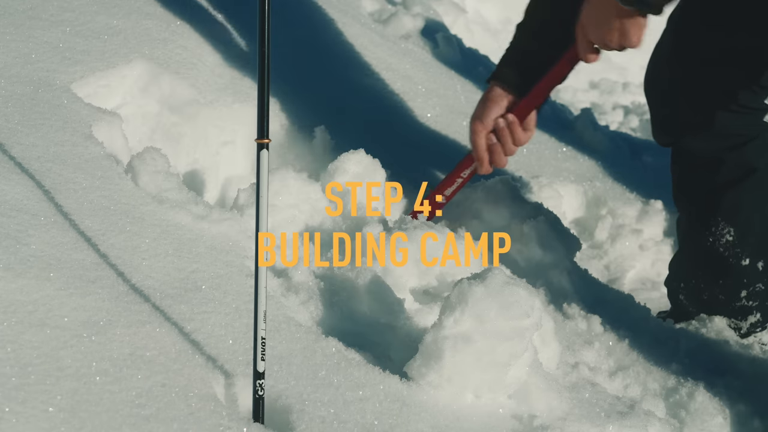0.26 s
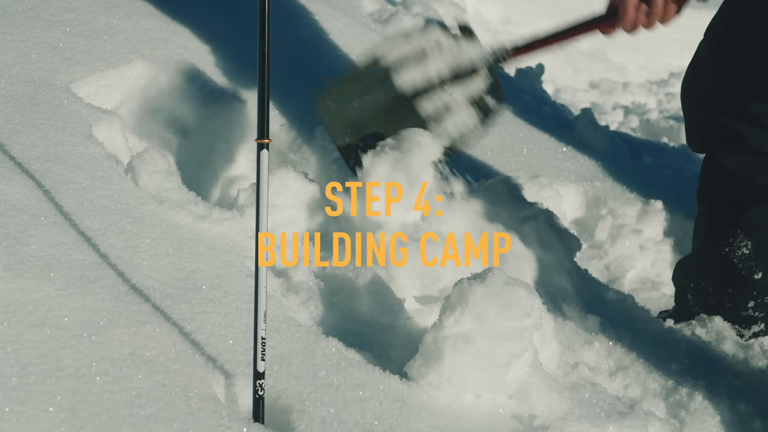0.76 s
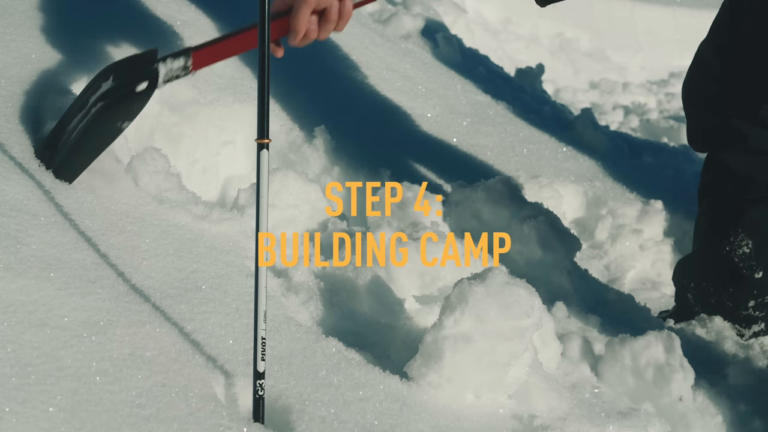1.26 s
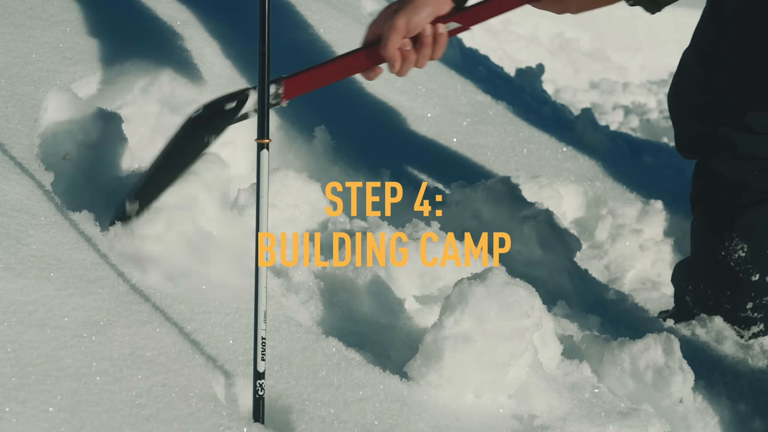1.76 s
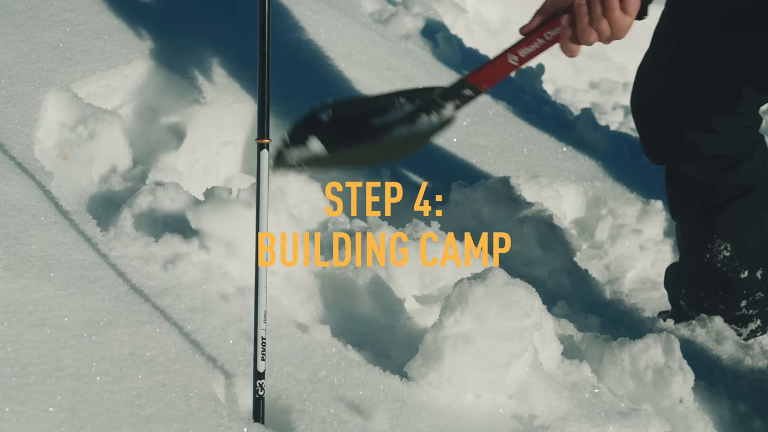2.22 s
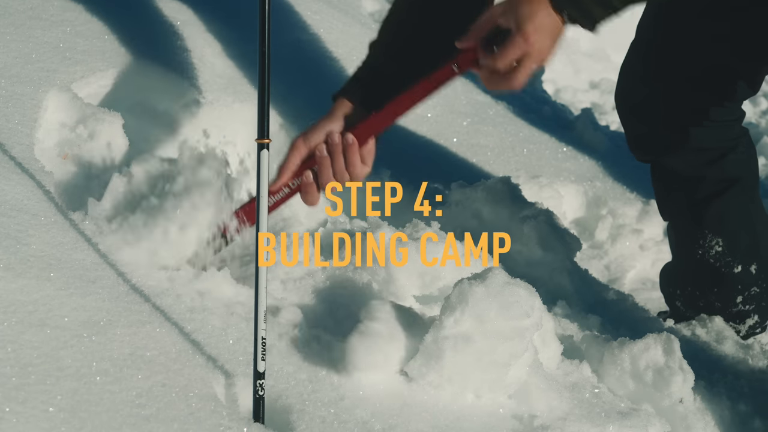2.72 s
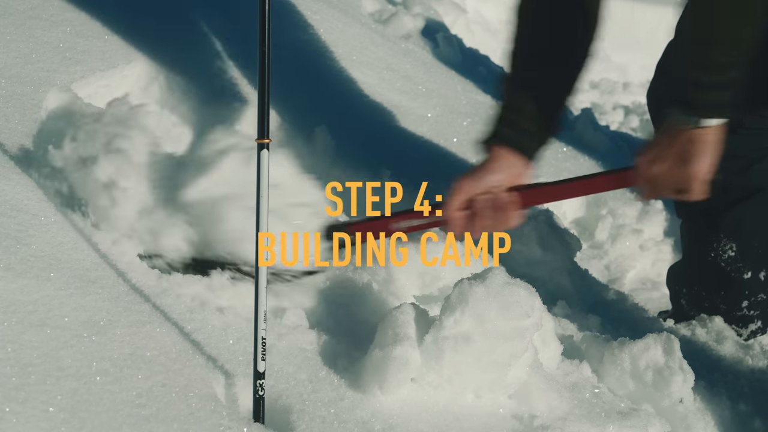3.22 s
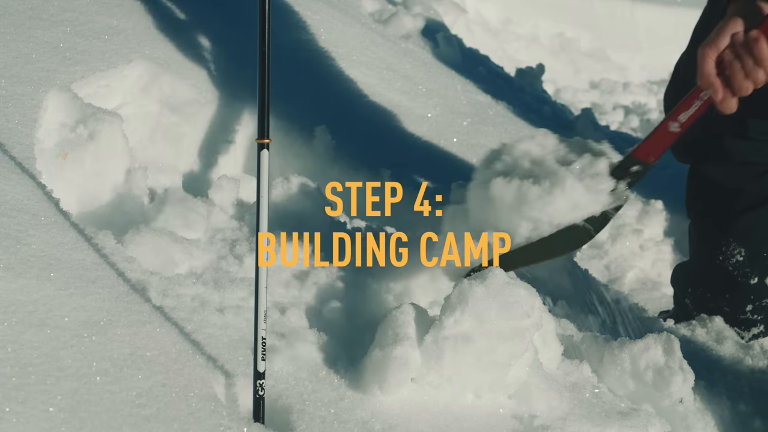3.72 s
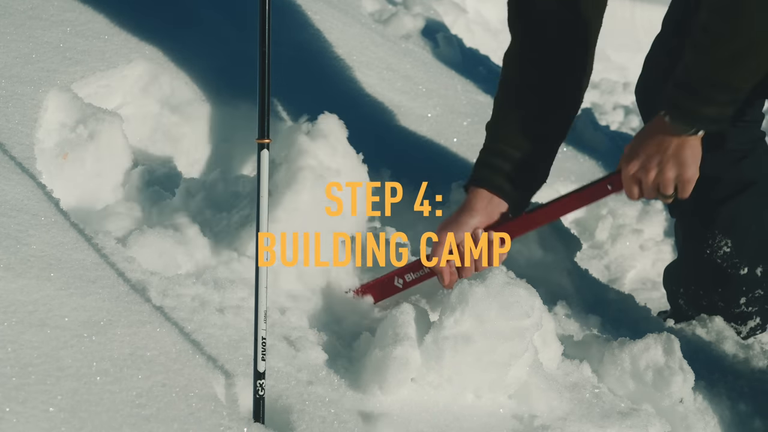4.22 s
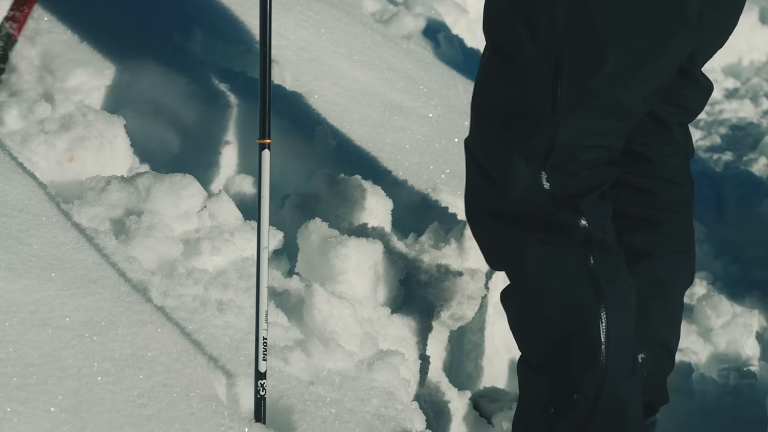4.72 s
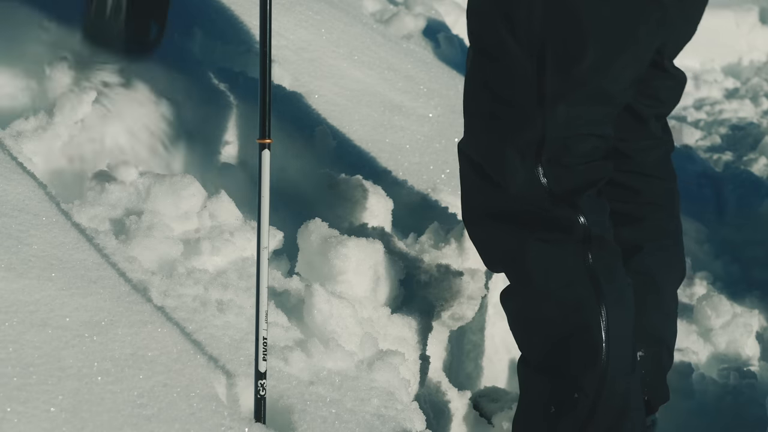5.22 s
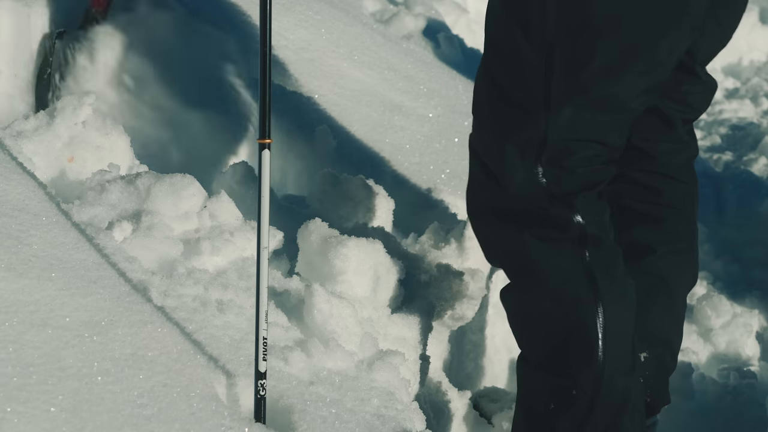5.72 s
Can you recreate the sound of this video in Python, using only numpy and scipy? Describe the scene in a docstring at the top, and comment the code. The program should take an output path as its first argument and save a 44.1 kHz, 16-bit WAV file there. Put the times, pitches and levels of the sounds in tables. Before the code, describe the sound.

One nearby microphone catches a shovel digging snow with no echo, the same in both channels. Quiet crunches lead into bright icy stabs and long scraping cuts, answered by trickling crumbs, light metallic pings and muffled lumps. Later strokes are shorter and softer, with low snowpack booms, a few scoops near five seconds and a final crisp jab. Only faint hiss and a low drone lie behind.

```python
"""Shovelling deep snow

A metal shovel digs outdoors, close to one microphone, with no echo and only faint air behind it.
Blade strokes and stabs are showers of random ice fractures, coloured and passed through blade resonances.
Crumbs tick as noise cracks with ringing modes, and lumps thud as damped sines with a puff of noise.
Low filtered noise makes the snowpack boom; steady hiss and a low drone make the air."""
import sys
import numpy as np
from scipy import signal
from scipy.fft import rfft, irfft, next_fast_len
from scipy.io import wavfile
from scipy.ndimage import uniform_filter1d, map_coordinates

SR = 44100
rng = np.random.default_rng(int(sys.argv[2]) if len(sys.argv) > 2 else 0)


def wav_record(signal):
    """Record a signal, one row per channel, as 16-bit PCM in the file named by sys.argv[1]."""
    frames = np.transpose(np.atleast_2d(signal))
    bounded = np.clip(frames, -1, 1)
    # unit amplitude maps onto the largest positive 16-bit level
    quanta = np.round(bounded * 32767).astype(np.int16)
    wavfile.write(sys.argv[1], SR, quanta)


N = 263156
TIME = np.arange(N) / SR

# modes of the bare blade: (frequency [Hz], width [Hz], level [dB])
BLADE_MODES = [(701, 36, -1), (850, 26, -8), (1243, 58, -11), (1475, 58, -3.5), (1632, 94, -2),
               (1885, 62, -5), (2127, 90, -3.5), (2418, 25, -14), (3084, 58, -11), (3420, 37, -8),
               (4370, 170, -11.5), (4950, 160, -13), (6390, 190, -8), (7220, 220, -5.5), (8290, 240, 3)]
# spectrum of snow crushed by the blade: (frequency [Hz], relative level [dB])
CRUSH_SPECTRUM = [(100, -46), (280, -22), (480, -1.5), (680, -1), (1100, 3.5), (1500, -1.5), (2300, -10.5),
                  (5000, -23.5)]
# spectrum of the yielding pack: (frequency [Hz], relative level [dB])
PACK_SPECTRUM = [(20, -15), (45, -21), (70, 1), (120, -5.5), (220, 1), (350, 1.5), (600, -4.5), (1500, -23)]
# spectrum of flying powder: (frequency [Hz], relative level [dB])
POWDER_SPECTRUM = [(2500, -40), (6000, -3.5), (8800, 3), (11000, -0.5), (14000, -2), (16000, -7.5)]


def digging():
    """Each movement drives edge, face, pack and powder; the blade's ring in dB is averaged by edge power."""
    # Movements: (start [s], rise [s], hold [s], level [dB], sag over the hold [dB],
    # extra load [dB], extra powder [dB], free ring of the blade [dB])
    # the edge slices fast through firm snow
    cuts = [(1.37, 0.077, 0.033, -47, -2.5, -5, -3, -1.5), (1.47, 0.13, 0.13, -24, 9, -3, -3, 3),
            (1.71, 0.059, 0.078, -32, 3.5, 0, -2.5, 6), (2.455, 0.078, 0.13, -23, 14.5, 5, 7, -1),
            (3.84, 0.059, 0.056, -32, -1.5, -9, 0, -20), (3.945, 0.03, 0.093, -35.5, 0, -2.5, 4.5, -7.5)]
    # the blade slides under a block and carries it
    scoops = [(.18, 0.28, 0.13, -44.5, -1, 3, -8.5, 5), (.565, 0.055, 0.036, -45, -1, 1, 2.5, 6),
              (3.07, 0.06, 0.13, -49.5, 3, 6, 4.5, -4), (3.345, 0.036, .065, -48, -5.5, -3.5, 4.5, -8),
              (4.9, 0.043, 0.083, -40.5, 3.5, -8, 1, 6), (4.98, 0.058, 0.082, -40.5, 0, -4, 0, -29),
              (5.11, 0.037, 0.049, -41.5, 6.5, -17, 3.5, -6)]
    # levering and treading squeeze the pack
    presses = [(0, 0.02, 0.176, -71, 0, 6.5, -3, -5), (.16, 0.06, 0.091, -57.5, 0, 6, -12.5, -12),
               (1.25, 0.02, 0.052, -54, -1.5, 1, 7, -2), (2.705, .025, 0.056, -46, 5, 1, -4, -6),
               (2.885, 0.033, 0.11, -53, -2.5, 4.5, -4, -30), (3.03, 0.092, 0.069, -53, -2.5, -2, 2, -8),
               (3.26, 0.027, 0.053, -58, -1.5, -6, 0, -6), (3.95, 0.061, .11, -53.5, 3, 8, 5, -9),
               (4.14, 0.057, 0.093, -61.5, 1, 5.5, 8.5, -15),
               (4.305, 0.024, 0.079, -51.5, 5.5, 0, 2.5, -11),
               (4.44, 0.031, .15, -58.5, -1.5, -0.5, 2.5, -1), (4.69, 0.088, 0.099, -50.5, -1, 3, 2.5, -10),
               (5.69, .04, 0.15, -60, 4, 2.5, 5.5, -4), (5.82, 0.095, 0.06, -52.5, 2.5, 3, 2, -9)]
    # loose snow runs off the blade
    spills = [(.65, 0.022, .11, -50.5, 1, 1, -4.5, 9), (1.89, 0.045, 0.0182, -54.5, 2, -2, -1.5, 11),
              (1.966, 0.015, 0.036, -53, 2, 0.5, -4, 6), (2.03, .03, 0.12, -65, 2, 10, -4, 9),
              (2.195, 0.05, 0.018, -50.5, 14, -3, -8, 19), (2.27, 0.033, 0.041, -57.5, 4, 0, -0.5, 3),
              (3.44, 0.024, 0.062, -51, 5.5, 3.5, -1.5, 0.5), (3.545, 0.084, 0.086, -46.5, 6, -11, -4, -8),
              (3.72, .04, 0.094, -62, 8, 14.5, -3, -10.5), (5.225, 0.0385, 0.084, -53.5, 12, -9, 5.5, -16)]
    # fine powder sifts down
    sifts = [(.095, 0.037, 0.062, -56, 0, 0, 0.0071, -13), (.78, 0.032, .4, -65.5, -3.5, 0, 0.0055, 0),
             (1.028, 0.0068, .025, -51, 10.5, 0, 0, 0), (2.29, .08, 0.093, -58.5, 8, 0, 0.029, -5),
             (5.31, 0.091, 0.087, -65, 16, 0, 0.008, -8.5)]
    # What each kind stirs up, re its level: (scraping [dB], crushing [dB], pack yielding [dB],
    # powder [dB], loaded ring before its trade with the free ring [dB], release t60 of the push [s])
    # balance of a cut
    cut_mix = (-1, -7.5, -27, -11.5, -11, 0.19)
    # balance of a scoop
    scoop_mix = (-1, 1.5, -13, -7.5, 4, 0.05)
    # balance of a press
    press_mix = (0.5, 2, -3.5, -6, -8.5, 0.32)
    # balance of a spill
    spill_mix = (0, -7, -14, -0.5, -13, 0.1554)
    # balance of a sift
    sift_mix = (-6.5, -46, -30, -1, -6.5, 0.07)
    powder_power, pack_power = 1.3, 0.84  # powder flies only at speed; the pack yields even to a slow push
    load_crush = 0.34  # share of the extra load, in dB, that also goes into crushing
    ring_trade = 0.27  # dB gained by the loaded modes for each dB that snow takes from the free ring

    power = np.zeros((4, N))
    ring = np.zeros((2, N))
    kinds = [(cuts, cut_mix), (scoops, scoop_mix), (presses, press_mix),
             (spills, spill_mix), (sifts, sift_mix)]
    for rows, mix in kinds:
        edge_db, face_db, pack_db, powder_db, loaded_db, t60 = mix
        for s, rise, hold, db, sag_db, load_db, more_powder_db, free_db in rows:
            span = slice(*np.searchsorted(TIME, [s, s + rise + hold + 2 * t60]))
            push = effort(TIME[span] - s, rise, hold, sag_db, t60)
            edge = amp(edge_db) * push
            face = amp(face_db + load_crush * load_db) * push
            weight = amp(pack_db + load_db) * push ** pack_power
            spray = amp(powder_db + more_powder_db) * push ** powder_power
            drive = amp(db) * np.array([edge, face, weight, spray])
            power[:, span] += drive ** 2
            ring[:, span] += np.outer([free_db, loaded_db - ring_trade * free_db], drive[0] ** 2)
    return np.sqrt(power), ring / (power[0] + 1e-20)


def effort(t, rise, hold, sag_db, t60):
    """A movement swells gradually, sags over its hold (climbs if negative), then dies away."""
    swell = np.clip(t / max(rise, 1e-3), 0, 1) ** 1.65  # gathers speed gradually
    held = np.clip((t - rise) / max(hold, 1e-3), 0, 1)
    release = np.maximum(t - rise - hold, 0)
    return swell * amp(-sag_db * held - 60 * release / t60)


def strokes(drive, ring_db):
    """The blade slides through snow: its edge scrapes, its face crushes, the pack yields and powder sprays."""
    # spectrum of grains under the edge: (frequency [Hz], relative level [dB])
    scrape_spectrum = [(400, -27.5), (900, -9.5), (1700, -1.5), (2600, -1.5), (4000, 1.5), (5600, -3),
                       (7200, -7.5), (9500, -14.5), (16000, -38)]
    edge, face, weight, spray = drive
    edge_snaps = fractures(rate=7000, spread_db=3.0, clump_db=0.9, clump_rate=110)
    scrape = on_blade(patchy(coloured(edge_snaps, scrape_spectrum), depth_db=1.17), *ring_db)
    face_snaps = fractures(rate=2500, spread_db=2.5, clump_db=1.0, clump_rate=130)
    crush = on_blade(patchy(coloured(face_snaps, CRUSH_SPECTRUM), depth_db=2.0), *ring_db)
    pack_snaps = fractures(rate=1200, spread_db=2, clump_db=-1.0, clump_rate=79)
    pack = coloured(pack_snaps, PACK_SPECTRUM)
    powder_snaps = fractures(rate=18000, spread_db=2.5, clump_db=-0.8, clump_rate=100)
    powder = coloured(powder_snaps, POWDER_SPECTRUM)
    judder = amp(1.15 * wobble(70))  # the blade sticks and slips
    return judder * (edge * scrape + face * crush + weight * pack + spray * powder)


def stabs():
    """A fast thrust shatters the crust in one dense, bright burst."""
    # quick stabs through the crust: (time [s], level [dB], rise [s], hold [s], t60 [s],
    # crush re level [dB], thud re level [dB], powder re level [dB])
    thrusts = [(1.21, -40, 0.0053, 0.011, .04, -20, -37, -1.5),
               (1.224, -34, 0.0041, 0.014, 0.062, -19, -26, -4),
               (1.235, -24.5, 0.0084, 0.009, 0.044, -12, -31.5, -12.5),
               (1.295, -35, .004, 0.015, 0.15, -10.5, -24, -10.5),
               (2.445, -51, .001, 0.00274, .03, -13, -23, -10),
               (2.458, -41.5, .0015, 0.0093, 0.067, -9, -23, -2),
               (2.473, -28, 0.0071, 0.0109, 0.058, -14.5, -38, -5),
               (3.872, -44, 0.0028, 0.0055, 0.055, 0, -19.5, -1),
               (3.973, -37, 0.0029, .008, 0.097, 0.5, -11, 1),
               (4.545, -30.5, .0016, 0.023, 0.11, -1.5, -8, -4.5),
               (5.133, -38, 0.0029, 0.0084, 0.054, -7, -18, -9),
               (5.608, -52, 0.0042, .012, .03, -13, -24.5, 4),
               (5.626, -23.5, 0.00088, 0.026, 0.136, -10, -23.5, -6.5),
               (5.669, -34, 0.0057, 0.041, 0.053, -5, -11, -6)]
    # spectrum of the breaking crust: (frequency [Hz], relative level [dB])
    crust_spectrum = [(400, -58), (900, -9.5), (1800, -2.5), (3200, -1.5), (4300, 3.5), (5600, -1.5),
                      (7000, -3), (9000, -14), (16000, -39)]

    def shatter():
        """Ice bonds snap in a dense shower."""
        return fractures(rate=14000, spread_db=2.2, clump_db=1.4, clump_rate=300)

    crust = on_blade(coloured(shatter(), crust_spectrum), free_db=-6, loaded_db=-5)
    powder = coloured(shatter(), POWDER_SPECTRUM)
    crush = coloured(shatter(), CRUSH_SPECTRUM)
    pack = coloured(rng.standard_normal(N), PACK_SPECTRUM)
    out = np.zeros(N)
    for s, db, rise, hold, t60, crush_db, thud_db, powder_db in thrusts:
        snow = crust + amp(crush_db) * crush + amp(thud_db) * pack + amp(powder_db) * powder
        out += amp(db) * burst(s, rise, hold, t60) * snow
    return out


def crumbs(drive, ring_db):
    """Loose crumbs trickle off the disturbed snow in small, sparse clicks."""
    spectrum = [(200, -2.5), (700, -1.5), (1500, -6.5), (4000, -6.5), (9000, -15), (16000, -24)]
    stirred = np.sqrt(np.abs(uniform_filter1d(drive[1], size=SR // 8)))  # follows the smoothed crushing
    clicks = fractures(rate=70, spread_db=2, clump_db=1, clump_rate=10)
    return amp(-35.5) * stirred * on_blade(coloured(clicks, spectrum), *ring_db)


def ticks():
    """Hard crumbs crack against the blade and ring most the modes near the contact's own pitch."""
    # bits of crust and ice strike the blade:
    # (time [s], level of the whole tick [dB], brightest frequency [Hz], ring before the -12.5 dB trim [dB])
    strikes = [(0.725, -29.5, 1680, 4), (0.728, -30.5, 3450, 15.5), (0.783, -39, 2100, 2),
               (1.033, -36.5, 7960, 2), (1.074, -41.5, 911, -1.5), (1.274, -22, 3330, 5.5),
               (1.876, -19.5, 845, -7.5), (1.893, -31, 7000, -6), (1.952, -31, 1110, -4),
               (1.973, -35.5, 1570, 5), (1.999, -33.5, 2030, 11.5), (2.052, -40.5, 1680, 12),
               (2.098, -43, 732, 7), (2.128, -37, 1500, -2.5), (2.143, -32, 703, 5.5),
               (2.204, -32.5, 686, -5), (2.235, -26, 1400, 3.5), (2.243, -29.5, 720, -3),
               (2.283, -31.5, 740, -5), (2.717, -18.5, 546, -16), (2.975, -24.5, 700, -6),
               (3.258, -28, 6000, -1), (3.32, -34, 869, -1), (3.374, -27, 720, 6),
               (3.771, -39.5, 8450, 12.5), (3.84, -32.5, 1290, -1), (4.158, -30, 974, -9),
               (4.185, -34, 1810, 3), (4.323, -29.5, 778, -12), (4.727, -32.5, 1350, -18),
               (5.01, -24.5, 665, -17.5), (5.135, -26.5, 611, -1.5), (5.187, -22, 1380, -13),
               (5.336, -34, 1430, -15), (5.463, -45, 1450, 3.5)]
    out = np.zeros(N + SR)
    t = np.arange(SR // 5) / SR
    hz, width, mode_db = np.transpose(BLADE_MODES)
    grid = np.fft.rfftfreq(len(t), 1 / SR) + 1
    radiation = 1 / np.hypot(1, (520 / grid) ** 2)  # a thin sheet gives off little bass
    attack = np.minimum(t / 0.00079, 1)
    for s, db, bright_hz, ring_db in strikes:
        contact = lambda f: 1 / np.hypot(1, 0.62 * (f / bright_hz - bright_hz / f))
        noise = rfft(rng.standard_normal(len(t)))
        grit = unit(irfft(noise * contact(grid) * radiation, len(t)))
        crack = grit * amp(-60 * t / 0.02)
        scatter_db = rng.normal(0, 2.5, len(hz))  # each strike excites the modes a little differently
        strength = amp(mode_db + scatter_db) * contact(hz) ** 2
        cycles = np.outer(hz, t) + rng.random((len(hz), 1))
        modes = np.exp(-np.pi * np.outer(width, t)) * np.sin(2 * np.pi * cycles)
        ring = strength @ modes / np.linalg.norm(strength)
        tick = amp(-9) * crack + amp(ring_db - 12.5) * ring
        out[round(s * SR):][:len(t)] += amp(db) * attack * tick
    return out[:N]


def thuds():
    """Soft lumps give one dull, heavily damped knock and a puff of crumbs."""
    # lumps land, blocks break loose and the shovel knocks:
    # (time [s], level of knock and puff together before their trims [dB], pitch [Hz], t60 [s])
    knocks = [(0.439, -32, 328, 0.032), (0.648, -27, 474, 0.023), (1.876, -38, 850, 0.044),
              (1.878, -41.5, 517, 0.12), (2.134, -37, 209, 0.097), (2.142, -58, 686, .07),
              (2.247, -45.5, 660, 0.12), (2.716, -28, 325, 0.018), (2.897, -29, 472, 0.015),
              (2.976, -34.5, 352, 0.018), (3.978, -32, 406, 0.019), (4.093, -29, 296, 0.016),
              (4.322, -31.5, 273, 0.027)]
    # spectrum of the puff: (frequency [Hz], relative level [dB])
    lump_spectrum = [(25, -19), (70, -21), (130, 3.5), (220, -1), (400, 2.5), (650, 1), (1200, -9),
                     (3000, -16), (12000, -49)]
    puff = coloured(rng.standard_normal(N), lump_spectrum)
    out = np.zeros(N)
    for s, db, hz, t60 in knocks:
        knock = np.sin(2 * np.pi * hz * (TIME - s))
        envelope = burst(s, rise=0.0013, hold=0.00094, t60=t60)
        out += amp(db) * envelope * (amp(-7.5) * knock + amp(-10.0) * puff)
    return out


def booms():
    """The deep snowpack settles under a load with a low, slowly fading rumble."""
    # each boom of the snowpack: (time [s], level [dB], t60 [s])
    settlings = [(1.25, -56.5, 0.49), (2.16, -58, 0.22), (2.585, -50.5, 0.5), (2.92, -61, 0.44),
                 (4.325, -49.5, 0.343), (4.555, -42.5, 0.29)]
    spectrum = [(20, -21), (45, -13), (72, 11.0), (100, 1), (150, -14), (400, -36.5)]
    rumble = coloured(rng.standard_normal(N), spectrum)
    return rumble * sum(amp(db) * burst(s, rise=0.0068, hold=0.0096, t60=t60) for s, db, t60 in settlings)


def air():
    """Faint open-air hiss over a far, low drone, both steady filtered noise."""
    # spectrum of the open air: (frequency [Hz], relative level [dB])
    air_spectrum = [(15, -53), (25, -17), (59, -7), (111, -17), (145, -12), (223, -3), (256, -10.5),
                    (1370, -9.5), (2480, -15.5), (14800, -12.5), (16000, -24.5)]
    drone_spectrum = [(20, -24.5), (55, -14.5), (67, -4.5), (80, -19.5), (200, -27), (800, -86)]
    drone = coloured(rng.standard_normal(N), drone_spectrum)
    hiss = coloured(rng.standard_normal(N), air_spectrum)
    return amp(-67) * hiss + amp(-78) * drone


def fractures(rate, spread_db, clump_db, clump_rate):
    """Ice bonds snap at random, rate a second on average, mostly small and in little avalanches."""
    snaps = rng.random(N) < rate / SR
    size = amp(spread_db * np.minimum(rng.exponential(size=N), 4))
    sign = rng.choice([-1, 1], N)
    return unit(snaps * size * sign * amp(clump_db * wobble(clump_rate)))


def on_blade(x, free_db, loaded_db):
    """Grains heard directly and through the blade; its ring changes their colour but keeps their power."""
    # broader modes of the blade carrying snow: (frequency [Hz], width [Hz], level [dB])
    loaded_modes = [(657, 220, 0), (900, 70, -6.5), (2121, 580, -4.5), (2960, 40, -9), (3240, 710, -6),
                    (4230, 170, -25), (6680, 260, 2.5)]
    paths = np.array([x, resonances(x, BLADE_MODES), resonances(x, loaded_modes)])
    gains = np.array([np.ones(N), amp(free_db) * np.ones(N), amp(loaded_db) * np.ones(N)])
    correlation = paths @ paths.T / N
    power = np.sum(gains * (correlation @ gains), axis=0)
    return np.sum(gains * paths, axis=0) / np.sqrt(power)


def resonances(x, modes):
    """x through a sum of damped (Hz, width, dB) modes."""
    def response(hz):
        """Each mode is a band-pass peak, highest at its centre."""
        return sum(amp(db) * 1j * hz * w / (c * c - hz * hz + 1j * hz * w) for c, w, db in modes)

    return filtered(x, response)


def patchy(x, depth_db):
    """The colour drifts as the load of snow shifts on the blade."""
    z = signal.stft(x, nperseg=1024)[2]
    field = rng.standard_normal(z.shape)
    for _ in range(2):  # smooth over frequency, then time
        field = uniform_filter1d(uniform_filter1d(field, size=5, axis=0), size=9, axis=1)
    drifting = z * amp(depth_db * unit(field))
    return unit(signal.istft(drifting, nperseg=1024)[1][:N])


def burst(s, rise, hold, t60):
    """An envelope that rises, holds and dies away."""
    t = TIME - s
    release = np.maximum(t - rise - hold, 0)
    return np.clip(t / max(rise, 1e-4), 0, 1) * amp(-60 * release / max(t60, 1e-3))


def coloured(x, spectrum):
    """x shaped by (Hz, dB) points on a log frequency axis, at rms 1."""
    f, db = np.transpose(spectrum)
    return unit(filtered(x, lambda hz: amp(np.interp(np.log(hz + 1), np.log(f), db))))


def filtered(x, response):
    """x times a complex response of frequency."""
    m = next_fast_len(N + SR // 2)
    return irfft(rfft(x, m) * response(np.fft.rfftfreq(m, 1 / SR)), m)[:N]


def wobble(rate):
    """A smooth random curve, rate knots a second."""
    return map_coordinates(rng.standard_normal(int(N * rate / SR) + 4), [TIME * rate])


def unit(x):
    """x at rms 1."""
    return x / np.sqrt(np.mean(x ** 2) + 1e-20)


def amp(db):
    """Decibels to gain."""
    return 10 ** (np.asarray(db) / 20)


def scene():
    """All sources reach one microphone, alike in both channels."""
    drive, ring_db = digging()
    blade = strokes(drive, ring_db) + stabs()
    debris = crumbs(drive, ring_db) + ticks() + thuds()
    mono = blade + debris + booms() + air()
    return np.array([mono, mono])


def record(dry):
    """The recorder keeps nothing above its band limit."""
    top_hz = 16050
    return np.array([filtered(x, lambda hz: hz < top_hz) for x in dry])


dry = scene()
out = record(dry)
wav_record(out)
```